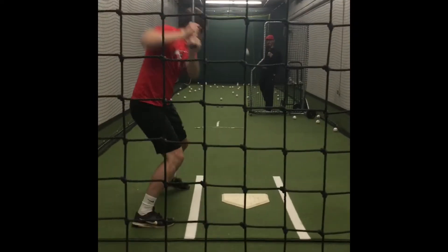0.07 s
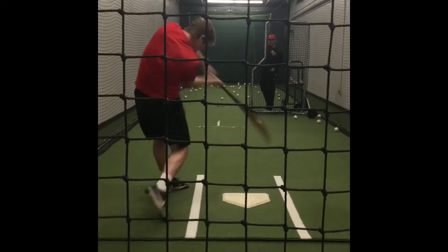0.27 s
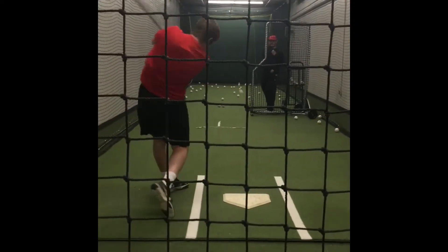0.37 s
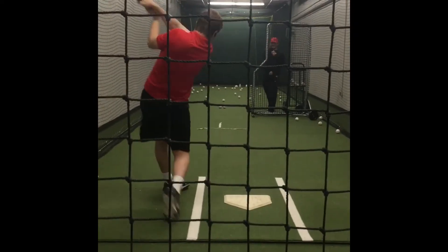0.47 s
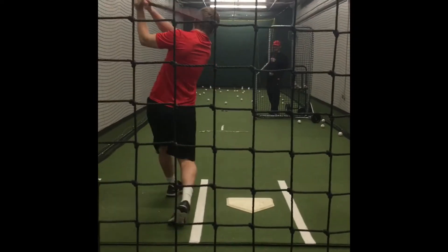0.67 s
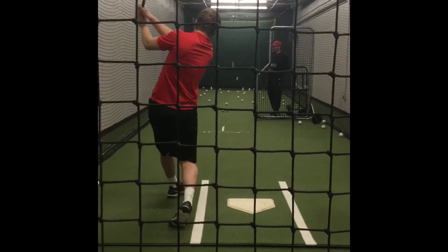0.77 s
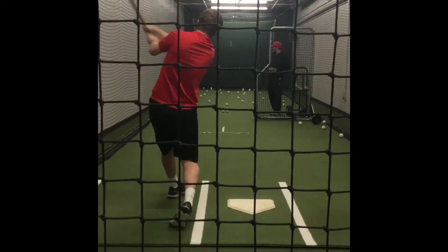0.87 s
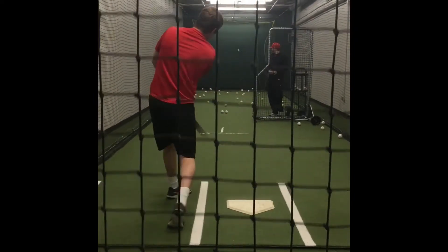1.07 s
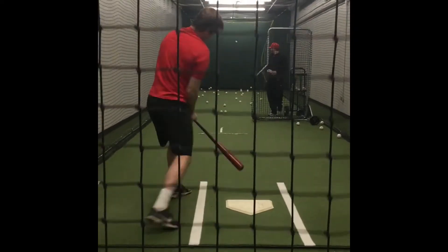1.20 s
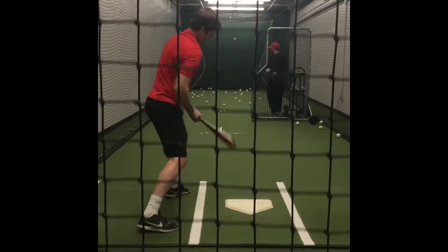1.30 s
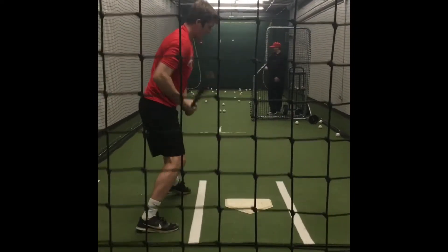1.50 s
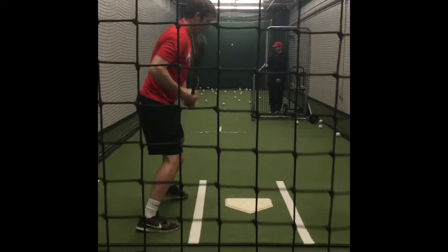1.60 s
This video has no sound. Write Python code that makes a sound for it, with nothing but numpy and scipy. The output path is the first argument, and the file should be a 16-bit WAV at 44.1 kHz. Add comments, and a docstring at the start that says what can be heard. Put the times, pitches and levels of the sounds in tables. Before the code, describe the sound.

Heard from behind the batter, a faint swish leads into one loud crack of wooden bat on ball. A clack and a dull backstop thud follow, and the indoor cage rings on over faint shoe scuffs and humming ventilation.

```python
"""A faint scuff and stride on turf, then a wooden bat swishes and cracks a ball in a long indoor cage.
The wood rings over a low punch. A bright clack comes back from down the lane and flutters between
the end walls. After a bright rustle, the ball thuds on the far backstop. The hall rings on while the
batter's shoes scuff over a low ventilation hum."""
import sys
import numpy as np
from scipy import signal
from scipy.fft import rfft, irfft
from scipy.io import wavfile

SR = 44100
rng = np.random.default_rng(int(sys.argv[2]) if len(sys.argv) > 2 else 0)


def master_out(mix):
    """Clip the mix to full scale and print it as 16-bit PCM to the path in sys.argv[1]."""
    frames = np.transpose(np.atleast_2d(mix))
    ceiling = np.clip(frames, -1, 1)
    pcm = np.round(ceiling * 32767).astype(np.int16)
    wavfile.write(sys.argv[1], SR, pcm)


N = 72765
HIT_S, CONTACT_S = .2192, .0002

# The woody ring of bat and ball. Each row: pitch in Hz, level in dB, decay (t60) in seconds.
WOOD_MODES = [(717, -14, 0.086), (900, -16, 0.044), (1126, -10, 0.074), (1308, -7, 0.031),
              (1497, -11, 0.062), (2596, -7.5, 0.042), (2838, -11, 0.043), (3296, -10.5, 0.024)]
# The crack's hard midrange bite. Each row: frequency in Hz, level in dB.
CRACK_COLOUR = [(60, -9), (180, -8.5), (300, -26), (500, -10), (750, 6), (1450, 3), (1850, -1.5),
                (2750, -5.5), (4500, -7.5), (7000, -13), (15000, -24.5)]

def crack(start):
    """One arrival of bat on ball: a snap, the ring of the wood and a brief crunch."""
    impulse = 1. * (np.arange(N) == round(start * SR))
    snap = tint(impulse, CRACK_COLOUR)
    smear_s = .00043
    wood = sum(undb(db) * ring(start + smear_s * rng.random(), hz, t60) for hz, db, t60 in WOOD_MODES)
    crunch = burst(start, CRACK_COLOUR, rise=CONTACT_S, t60=.018)
    return undb(4) * snap + undb(-4) * wood + undb(-10) * crunch


# Tight slaps off floor, walls and ceiling. Each row: delay in seconds, level in dB.
CRACK_ECHOES = [(.0054, -4.5), (.0087, -24.5), (0.0121, 1.5), (.0138, -4.5), (.0175, -12), (.0218, -12),
                (0.029, -16.5), (0.038, -19)]
# The low punch of the blow. Each row: pitch in Hz, level in dB, t60 in seconds.
PUNCH_MODES = [(70, -23.5, 0.125), (121, -20, 0.076), (186.7, -22, 0.068)]
# The crack's wash in the hall. Each row: frequency in Hz, level in dB.
CRACK_TAIL = [(40, -32), (75, 1), (170, -12), (400, -5), (720, 5.5), (1400, 0), (1900, -2.5), (2700, 4),
              (4500, -6), (7000, -14.5), (15000, -29)]

def bat():
    """The crack and its low punch; nearby surfaces and the hall throw the crack back."""
    near = crack(HIT_S) + sum(undb(db) * crack(HIT_S + lag) for lag, db in CRACK_ECHOES)
    scatter = undb(-11.5) * burst(HIT_S + .006, CRACK_COLOUR, rise=.0024, t60=.16)
    punch = sum(undb(db) * ring(HIT_S, hz, t60, rise=.005) for hz, db, t60 in PUNCH_MODES)
    return near + scatter + punch + undb(-18) * hall(HIT_S, CRACK_TAIL)


# The clack's bright, scooped tone. Each row: frequency in Hz, level in dB.
CLACK_COLOUR = [(100, -14), (330, -1), (1000, -29), (2000, -21), (2700, 6.5), (3400, 2), (4500, 6),
                (5400, -3.5), (7000, -19), (10000, -42), (16000, -61)]
# Slaps off the sides of the lane. Each row: delay in seconds, level in dB.
CLACK_ECHOES = [(.0032, 1.5), (.0072, -4.5), (0.0115, -2), (.021, -8)]
# The clack's warmer wash in the hall. Each row: frequency in Hz, level in dB.
CLACK_TAIL = [(100, -17.5), (350, 3), (1500, 5.5), (2700, -8), (4500, -7), (6500, -20.5), (15000, -50)]

def clack(start=.3228):
    """A clack off a hard surface down the lane; it returns, smeared, once per trip along the hall."""
    near = flutter = 0
    for lag, db in [(0, 0), *CLACK_ECHOES]:
        near += undb(db - 10.5) * burst(start + lag, CLACK_COLOUR, rise=CONTACT_S, t60=.025)
    trip_s, trip_loss_db = .133, 8
    for trip in range(3):
        echo = burst(start + (trip + 1) * trip_s, CLACK_COLOUR, rise=.0019, t60=.1)
        flutter += undb(-24.5 - trip * trip_loss_db) * echo
    return near + flutter + undb(-22.5) * hall(start, CLACK_TAIL)


# A bright, airy rustle. Each row: frequency in Hz, level in dB.
RUSTLE_COLOUR = [(500, -12), (3000, 11.5), (6000, -5), (9000, -7.5), (15000, -39)]
# Two thuds, the second duller. Each row: start in seconds, level in dB, low-pass cutoff in Hz.
THUDS = [(0.673, -18, 2400), (0.703, -16.5, 900)]
# The body of a thud. Each row: frequency in Hz, level in dB.
THUD_COLOUR = [(40, -35), (90, -6), (150, 3.5), (230, -13.5), (430, 5), (680, 3), (950, -2), (1700, -1.5),
               (3500, -12), (8000, -15)]
# The last thud's dark boom in the hall. Each row: frequency in Hz, level in dB.
THUD_TAIL = [(50, -27), (140, -7), (230, -14.5), (430, 1.5), (650, 1), (950, -9.5), (1800, -14),
             (4000, -28.5), (12000, -61)]

def backstop():
    """A bright rustle, then the ball thuds on the soft backstop, booming through the hall."""
    out = undb(-39) * noise(RUSTLE_COLOUR) * envelope(.65, rise=.0091, t60=.36, hold=.047)
    for start, db, cutoff_hz in THUDS:
        blow = noise(THUD_COLOUR) * envelope(start, rise=.0059, t60=.21)
        muffle = signal.butter(2, cutoff_hz, fs=SR, output="sos")
        out += undb(db) * signal.sosfilt(muffle, blow)
    return out + undb(-24) * hall(THUDS[-1][0], THUD_TAIL)


# The swing's deep whoosh. Each row: frequency in Hz, level in dB.
SWING_COLOUR = [(30, -23), (50, -21), (90, 5), (200, -10), (500, -17), (1500, -27.5), (4000, -29.5),
                (12000, -50)]
# The stride's soft weight. Each row: frequency in Hz, level in dB.
STRIDE_COLOUR = [(50, -18.5), (130, -1.5), (230, 4.5), (400, -19), (900, -18), (4000, -46)]
# Shoe scuffs and cloth rustles. Each row: start and rise in seconds, level in dB, t60 in seconds.
SCUFFS = [(.025, 0.028, -54.5, 0.45), (.11, 0.014, -58, .4), (.902, 0.016, -47, 0.56),
          (1.0, 0.016, -56.5, 1), (1.355, 0.018, -56, 0.68), (1.44, 0.027, -55.5, 0.3)]
# Their dry brush. Each row: frequency in Hz, level in dB.
SCUFF_COLOUR = [(150, -3.5), (500, 5), (1300, 3), (2500, 4), (4300, 0), (6500, -9), (9000, -13.5),
                (15000, -35.5)]

def batter():
    """A soft stride, a swish that peaks just before the hit, and scuffs on the turf."""
    peak_s, rise_s, fall_s = .207, .026, .03
    t = np.arange(N) / SR - peak_s
    swing = undb(-33) * noise(SWING_COLOUR) * np.exp(np.minimum(t / rise_s, -t / fall_s))
    stride = undb(-45) * noise(STRIDE_COLOUR) * envelope(.059, rise=.013, t60=.51)
    scuffs = sum(undb(db) * noise(SCUFF_COLOUR) * envelope(start, rise, t60)
                 for start, rise, db, t60 in SCUFFS)
    return swing + stride + scuffs


# The hall's decay, lingering in the lows. Each row: frequency in Hz, t60 in seconds.
HALL_T60 = [(70, 2.55), (250, 3.1), (500, 2.1), (1000, 1.75), (2000, 1.43), (4000, 1.27), (7000, 0.61),
            (11000, .45), (16000, 0.23)]

def hall(start, colour):
    """Diffuse tail of a blow: it builds up, then each half-octave dies at its own rate."""
    hz = np.fft.rfftfreq(N, 1 / SR)
    spectrum = rfft(noise(colour))
    tail = 0
    for centre in 2 ** np.arange(5, 14.5, .5):
        band = np.maximum(1 - 2 * abs(np.log2(np.maximum(hz, 1) / centre)), 0)
        tail += irfft(spectrum * band, N) * envelope(start, rise=.019, t60=lookup(HALL_T60, centre))
    return tail


# A low bed of moving air. Each row: frequency in Hz, level in dB.
AIR_COLOUR = [(25, -39), (38, -19.5), (55, 8), (100, 0.5), (280, -3.5), (500, -16.5), (1200, -19.5),
              (3000, -24), (5000, -29.5), (9000, -42.5), (16000, -57)]

def ventilation(hum_hz=54.1):
    """Steady air noise and a low hum."""
    hum = np.sqrt(2) * np.sin(2 * np.pi * hum_hz * since(0))
    return undb(-49.5) * noise(AIR_COLOUR) + undb(-53.5) * hum


def undb(db):
    """Decibels to gain."""
    return 10 ** (np.asarray(db) / 20)


def lookup(points, hz):
    """Read (Hz, value) points on a log-frequency axis."""
    freqs, values = np.array(points, float).T
    return np.interp(np.log(np.maximum(hz, 1)), np.log(freqs), values)


def since(start):
    """Seconds since start, zero before it."""
    return np.maximum(np.arange(N) / SR - start, 0)


def envelope(start, rise, t60, hold=0):
    """Linear rise, hold, then a fall of 60 dB per t60; all in seconds."""
    t = since(start)
    return np.minimum(t / rise, 1) * np.exp(-np.log(1000) * np.maximum(t - rise - hold, 0) / t60)


def ring(start, hz, t60, rise=CONTACT_S):
    """One struck mode: a dying sine."""
    return np.sin(2 * np.pi * hz * since(start)) * envelope(start, rise, t60)


def noise(colour):
    """Noise of rms 1 with the given colour."""
    hz = np.fft.rfftfreq(N, 1 / SR)
    x = irfft(np.exp(2j * np.pi * rng.random(len(hz))) * undb(lookup(colour, hz)), N)
    return x / np.std(x)


def tint(x, colour):
    """Minimum-phase filter with the given colour; white noise keeps its level."""
    gain = undb(lookup(colour, np.fft.rfftfreq(2 * N, 1 / SR)))
    cepstrum = irfft(np.log(gain / np.sqrt(np.mean(gain ** 2))))[:N]
    cepstrum[1:] *= 2
    return irfft(rfft(x, 2 * N) * np.exp(rfft(cepstrum, 2 * N)))[:N]


def burst(start, colour, rise, t60):
    """A coloured puff of noise from one blow."""
    return tint(rng.standard_normal(N) * envelope(start, rise, t60), colour)


def scene():
    """Everything at one microphone behind the batter."""
    return (bat() + clack() + backstop() + batter() + ventilation())[None]


def record(dry):
    """The phone rounds the loudest peaks and cuts the top."""
    top_hz = 15900
    return signal.sosfilt(signal.ellip(10, .2, 70, top_hz, fs=SR, output="sos"), np.tanh(dry))


dry = scene()
out = record(dry)
master_out(out)
```